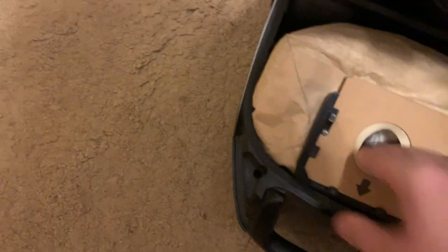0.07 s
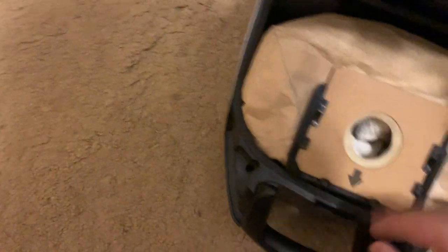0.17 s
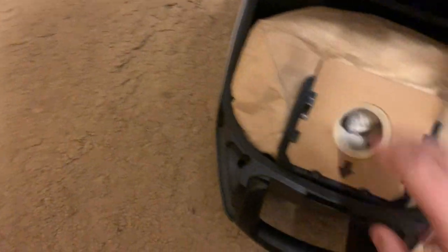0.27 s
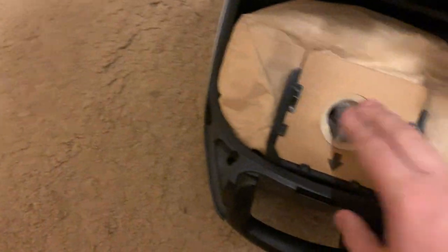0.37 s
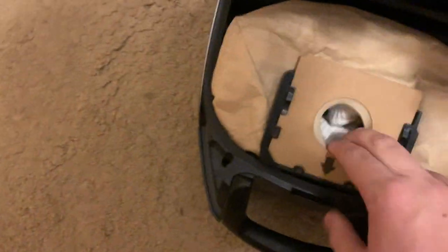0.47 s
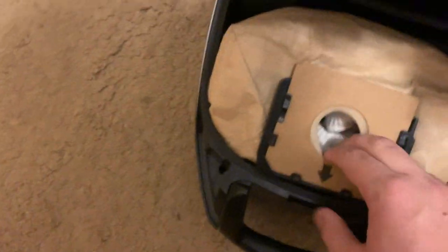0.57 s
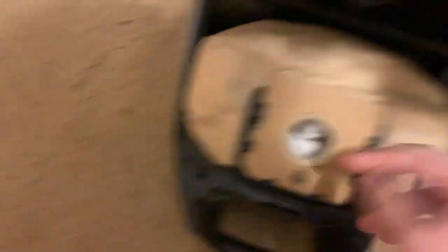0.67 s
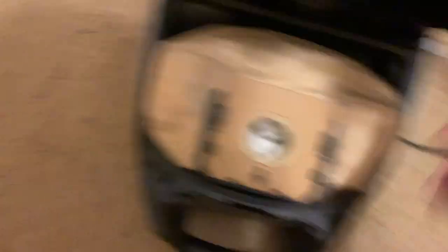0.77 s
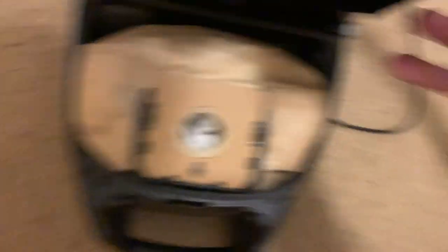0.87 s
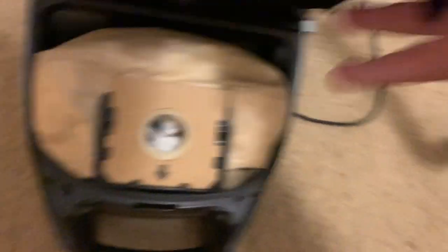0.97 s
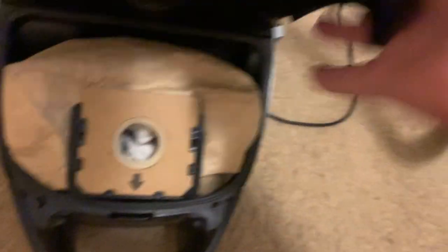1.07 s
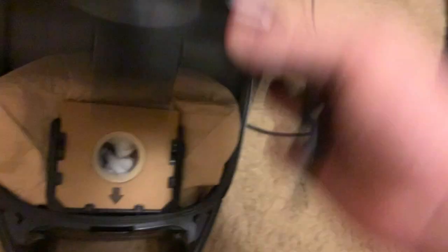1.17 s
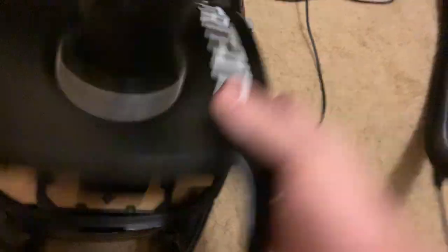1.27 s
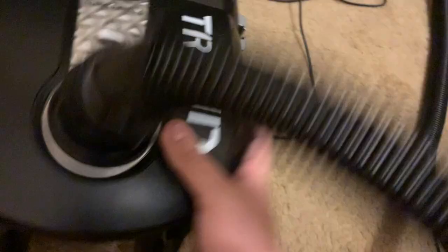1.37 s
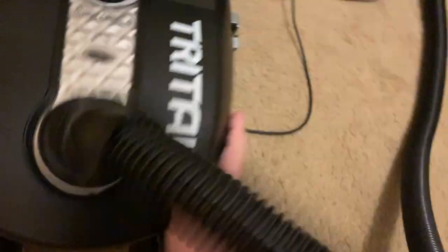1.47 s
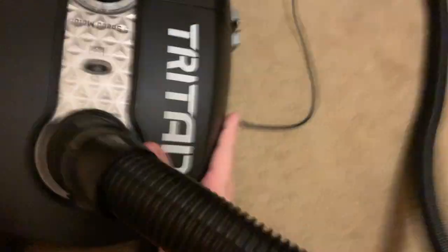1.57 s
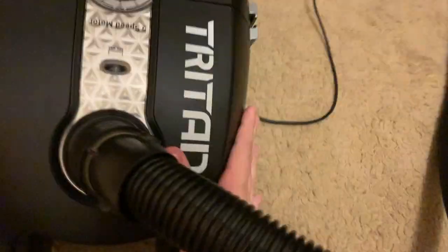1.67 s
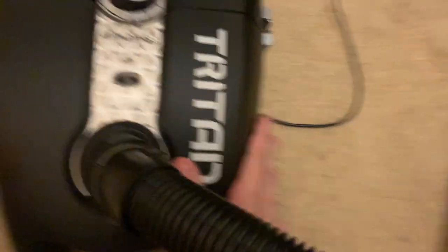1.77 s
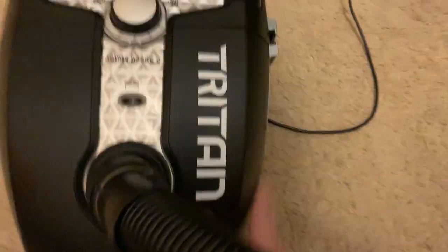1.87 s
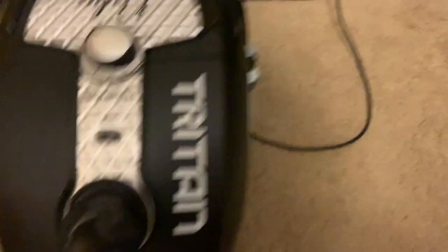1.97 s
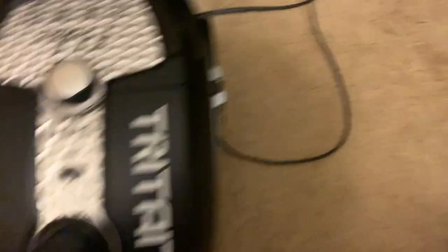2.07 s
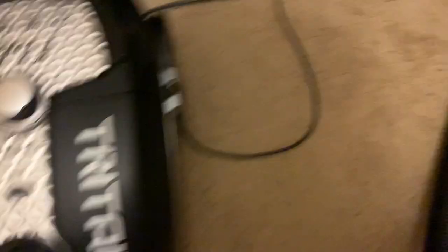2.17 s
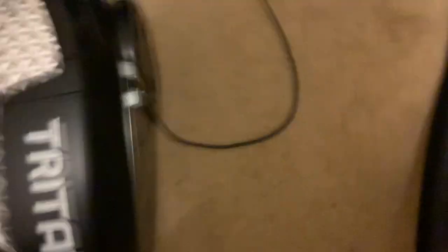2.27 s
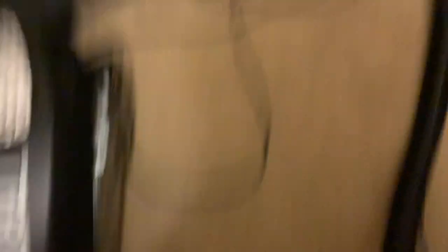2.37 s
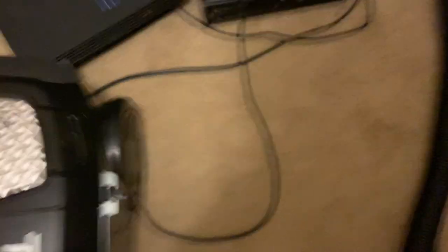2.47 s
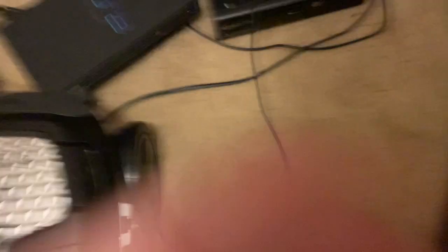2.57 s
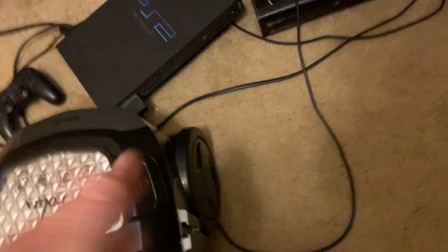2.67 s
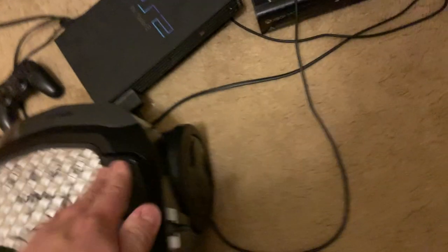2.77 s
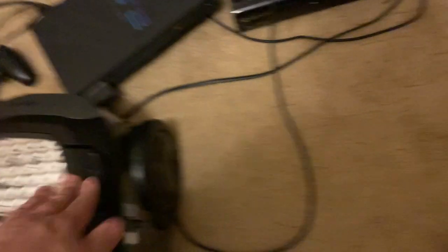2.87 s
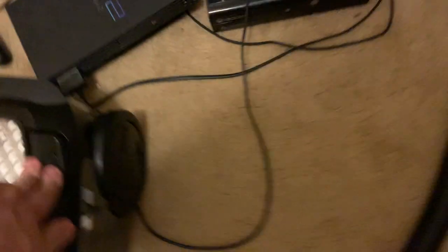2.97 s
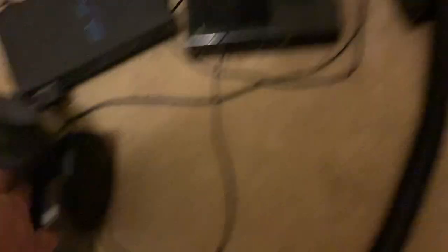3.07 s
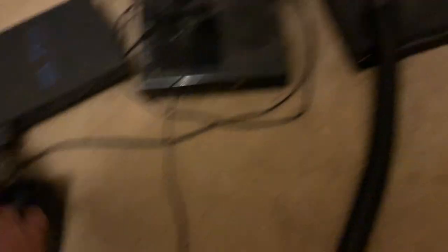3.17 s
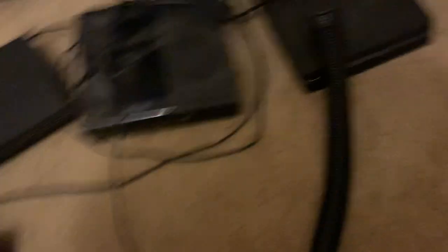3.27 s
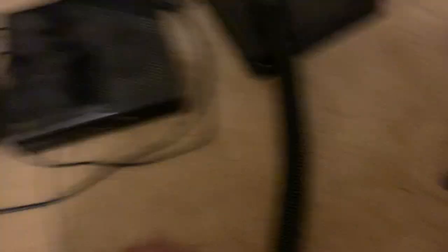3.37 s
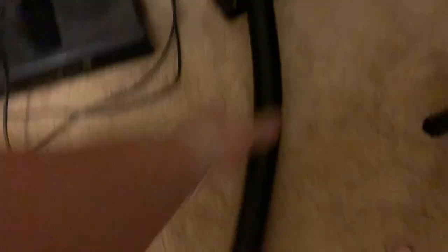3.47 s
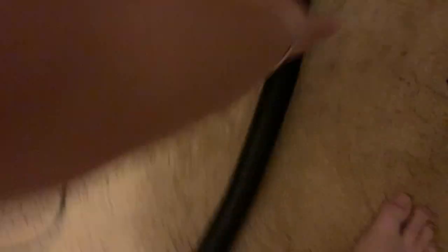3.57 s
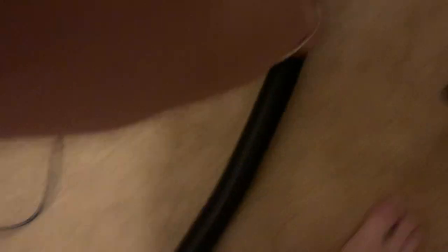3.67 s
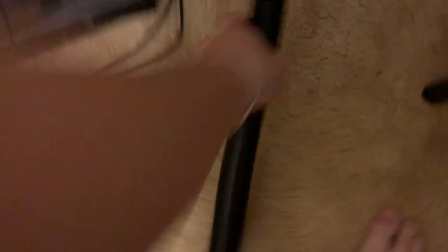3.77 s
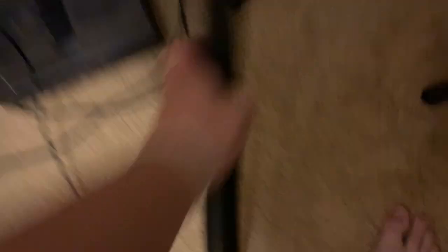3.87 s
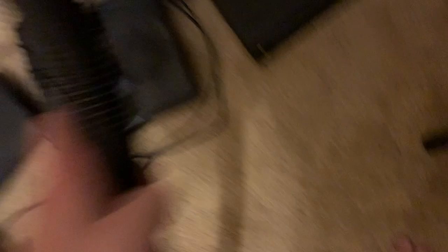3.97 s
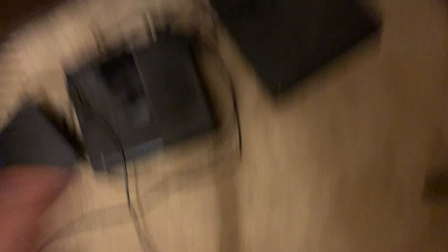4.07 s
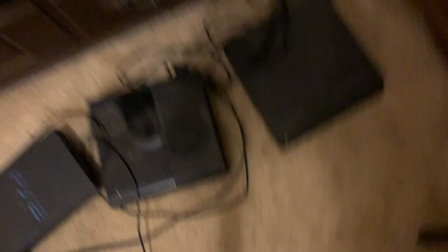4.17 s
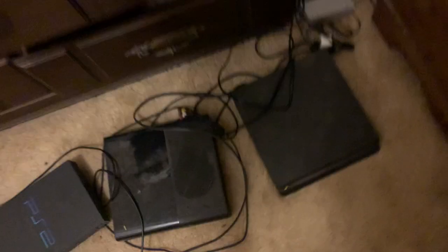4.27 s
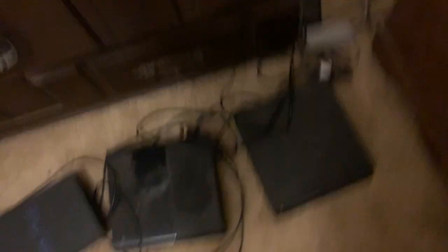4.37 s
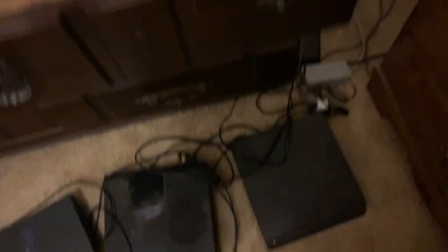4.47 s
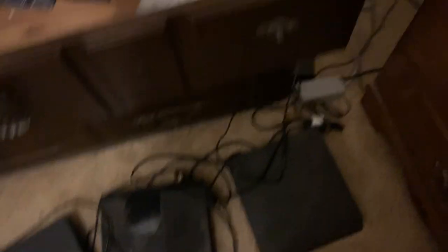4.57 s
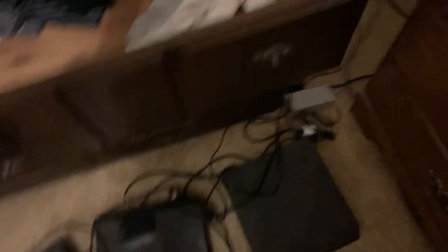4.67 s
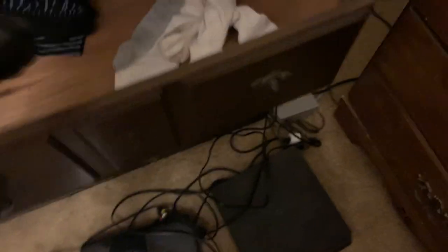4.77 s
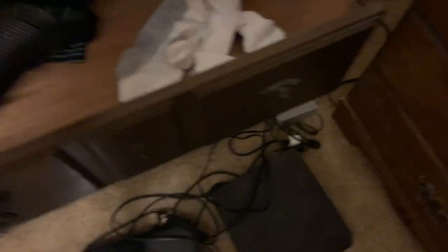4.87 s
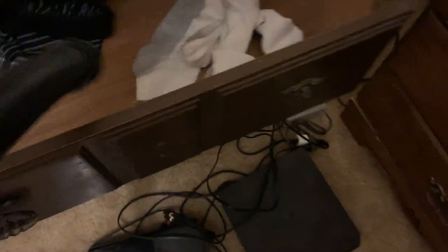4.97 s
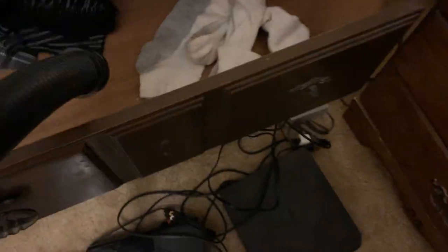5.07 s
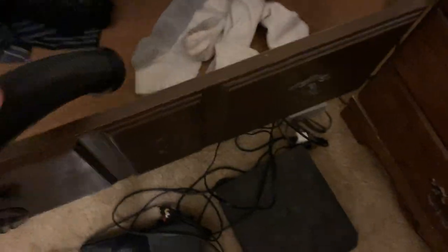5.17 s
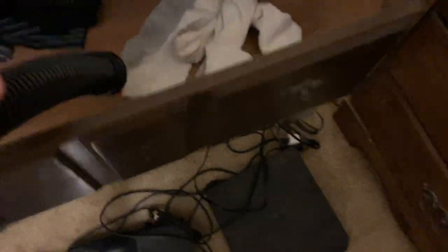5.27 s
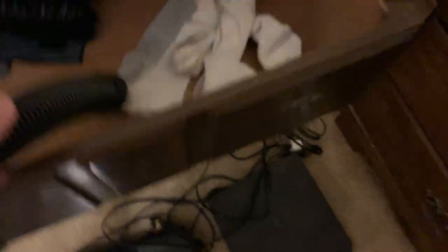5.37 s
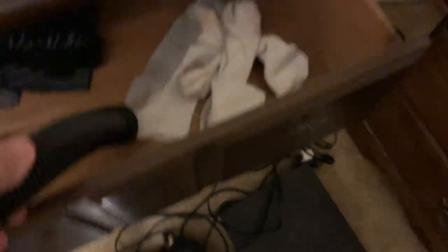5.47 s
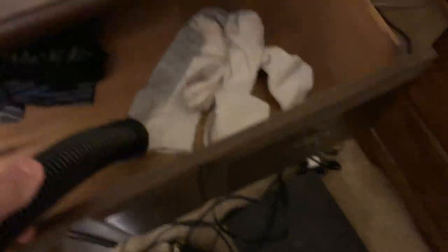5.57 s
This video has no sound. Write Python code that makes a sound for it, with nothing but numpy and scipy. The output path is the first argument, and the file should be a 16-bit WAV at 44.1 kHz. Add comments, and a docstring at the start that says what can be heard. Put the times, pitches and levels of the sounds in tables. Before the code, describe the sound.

A hand fiddles inside a canister vacuum, cracks its lid shut, presses the switch, and the motor spins up from mains hum into rushing air.

```python
"""Canister vacuum cleaner on a bedroom carpet: soft start with mains buzz, then rising whine and air rush.
Motor tones follow multiples of the shaft rate; air is filtered noise that grows with speed.
Before that a hand seats the bag holder, slams the plastic lid and presses the switch: noise bursts
and ringing modes. A hand-held camera with two microphone ports is close by; fingers shift on its body."""
import sys
import numpy as np
from scipy import signal
from scipy.fft import rfft, irfft, next_fast_len
from scipy.io import wavfile
from scipy.ndimage import uniform_filter1d, map_coordinates

SR = 44100
rng = np.random.default_rng(int(sys.argv[2]) if len(sys.argv) > 2 else 0)


def generate_wav(sig):
    """Save sig (samples, or channels by samples) to the path in sys.argv[1] as 16-bit PCM at SR."""
    pcm = np.round(np.clip(np.atleast_2d(sig).T, -1, 1) * 32767).astype(np.int16)
    wavfile.write(sys.argv[1], SR, pcm)


N = 248283

# motor shaft speed: time_s, rate_turns_per_s
SHAFT_SPEED = [(3.1, 2), (3.6, 38), (3.92, 96), (4.02, 121), (4.15, 172), (4.25, 205), (4.4, 256),
               (4.5, 285), (4.6, 306), (4.7, 328), (4.78, 340), (4.97, 372), (5.17, 411), (5.43, 456),
               (5.63, 484)]
# whine partials, each swelling at a casing resonance:
# multiple_of_shaft_rate, loudest_at_turns_per_s, half_width_turns_per_s, level_db
WHINE_PARTIALS = [(23.6, 104, 10, -57), (32, 178, 20, -67), (40, 190, 12, -68), (20, 300, 18, -57),
                  (18.5, 372, 20, -49), (24, 185, 9, -63), (16, 185, 10, -55), (16, 222, 22, -47),
                  (24, 226, 12, -56), (32, 240, 16, -57), (12, 272, 26, -48), (9, 255, 22, -52),
                  (14, 258, 16, -52), (10, 295, 30, -52), (16, 262, 16, -51), (12, 315, 18, -52),
                  (8, 356, 14, -49), (32, 335, 16, -55), (8, 290, 30, -52), (24, 278, 20, -46),
                  (24, 305, 9, -51), (24, 350, 12, -48), (16, 308, 11, -45), (16, 330, 11, -38),
                  (16, 383, 24, -45), (16, 412, 12, -46), (16, 445, 18, -42.5), (8, 468, 19, -41.5),
                  (24, 472, 20, -50)]
# breathy whistles of the air path:
# multiple_of_shaft_rate, loudest_at_turns_per_s, half_width_turns_per_s, level_db
AIR_WHISTLES = [(15, 195, 22, -57), (10.5, 200, 30, -58), (8, 255, 25, -50), (11.7, 285, 30, -48),
                (12.6, 325, 22, -46), (7.6, 325, 25, -50), (10, 352, 22, -47), (12.6, 378, 22, -45),
                (6.8, 378, 25, -47), (10.2, 412, 17, -41), (8.1, 415, 18, -47), (9, 440, 22, -41),
                (9.4, 474, 24, -37), (13.5, 470, 16, -43)]
# low air noise colour: freq_hz, density_db_per_hz
ROAR_COLOUR = [(40, -44), (90, 2), (150, 9), (210, 5), (350, -12), (520, 8.5), (750, 2.5), (1000, 2.5),
               (1500, -23.5), (3000, -37)]
# middle air noise colour: freq_hz, density_db_per_hz
RUSH_COLOUR = [(500, -6), (1200, -11), (1700, 2.5), (2400, 5), (3300, 3.5), (4100, 5), (4600, -2),
               (5200, -19), (6200, -14), (8000, -38.5)]
# high air and friction noise colour: freq_hz, density_db_per_hz
HISS_COLOUR = [(3000, -49.5), (4700, -7), (5300, 0), (6700, 5), (9000, 1), (10500, -1.5), (13000, -6.5),
               (16000, -16.5)]
# standing waves of hose and canister: freq_hz, width_hz, level_db
DUCT_MODES = [(219, 18.5, 8), (251, 15.7, 4), (311.2, 23, 2), (381.7, 24, 1.5), (445.3, 19, 3),
              (529, 24, -3), (576, 18, -4.5), (640, 21, -8.5), (725, 26, -8), (861, 37, -3.5),
              (928, 20, -3.5), (999, 12, -2), (1124, 30, -17), (1180, 37, -11.5), (1404, 56, -9)]
# roar and pipe growth with speed: full_speed_db, loss_db_per_octave, loss_db_per_octave_squared
ROAR_GROWTH = (-30.5, 11.94, 0.18)
# rush growth with speed: full_speed_db, loss_db_per_octave, loss_db_per_octave_squared
RUSH_GROWTH = (-36.5, 2.1, 6.5)
# hiss growth with speed: full_speed_db, loss_db_per_octave, loss_db_per_octave_squared
HISS_GROWTH = (-32.5, 12.9, 6.8)
# top hiss growth with speed: full_speed_db, loss_db_per_octave, loss_db_per_octave_squared
FIZZ_GROWTH = (-27.5, 17.4, 11)
# mains hum harmonics: freq_hz, level_db
MAINS_HARMONICS = [(120, 0), (240, -9.5), (360, -13), (600, -21)]
# mains noise during the soft start: time_s, hum_db, buzz_db
MAINS_LEVELS = [(2.9, -76, -100), (3.3, -67, -64.5), (3.6, -53.5, -67.5), (3.68, -48.5, -54),
                (4.2, -46, -49.5), (4.6, -47, -64), (5.63, -43, -66)]

# lid drops, rattles in its seat, catches and latches:
# start_s, strength_db, knock_over_clack_db, click_over_clack_db, panel_hz
LID_HITS = [(1.499, -48, -4, -4, 1490), (1.514, -28, -12, -5, 1495), (1.554, -19, -5.5, -10, 3360),
            (1.559, -26, -5, -13, 1080), (1.567, -22, -7.5, -8.5, 1250), (1.572, -16.5, -4, -13, 1246),
            (1.579, -24, 5.5, -11, 783), (1.59, -31.5, 6.5, -13, 690), (1.646, -28.5, -4.5, -5.5, 1289),
            (1.651, -11.5, -5.5, -1.5, 1328), (1.658, -21, 3.5, -9, 641), (1.668, -28.5, 1, -5, 1384),
            (1.678, -31, 1, -8, 1184)]
# lid ringing: freq_hz, level_db, t60_s
LID_MODES = [(610, -3, 0.084), (957, -14.5, 0.2), (1230, -25.5, 0.69), (1280, -13, 0.22),
             (1470, -13.5, 0.2), (1620, -10.5, 0.15), (2120, -22, 0.24), (3370, -23, 0.25),
             (3540, -26.5, 0.53), (3720, -22, 0.72), (4000, -32, 0.7), (5416, -34, 0.2), (6390, -31, 0.55),
             (6700, -28.5, 0.17)]
# lid knock colour: freq_hz, density_db_per_hz
LID_KNOCK_COLOUR = [(60, -16), (170, 1.5), (300, 2.5), (520, -5.5), (750, -6.5), (1400, -21), (4000, -73)]
# lid clack colour: freq_hz, density_db_per_hz
LID_CLACK_COLOUR = [(250, -30.5), (620, -5), (900, -9.5), (1200, 5.5), (1430, 4), (1900, -6.5), (3000, -7),
                    (3900, -1.5), (5500, -14.5), (12000, -48)]
# canister air excited by the lid: freq_hz, level_db
LID_AIR_MODES = [(190, -6), (265, -6.5), (335, -5), (385, -6.5), (465, -13.5), (600, -7.5), (680, -4)]
# power button goes down and springs back:
# start_s, strength_db, knock_over_clack_db, click_over_clack_db, panel_hz
SWITCH_HITS = [(2.888, -32.5, 1.7, -23.5, 943), (2.921, -36.5, 6, 7, 1016), (2.932, -41.5, 12.3, -9.5, 800),
               (3.068, -41, 4, 5, 910), (3.096, -25.5, 2, -8.5, 1735)]
# button ringing: freq_hz, level_db, t60_s
BUTTON_MODES = [(693, -2, 0.095), (874, -10, 0.34), (1230, -14, 0.05), (1780, -14, 0.27), (1970, -19, 0.2),
                (2320, -30, 0.2), (2550, -12, 0.11), (2680, -4.5, 0.043), (2850, -20, 0.16)]
# button clack colour: freq_hz, density_db_per_hz
BUTTON_CLACK_COLOUR = [(250, -22), (650, 1.5), (920, 5), (1300, -0.5), (1750, -2), (2600, -10.5),
                       (3800, -12), (5500, -17), (12000, -41.5)]
# canister air excited by the button: freq_hz, level_db
BUTTON_AIR_MODES = [(310, -5.5), (510, -5), (640, -17)]
# light plastic contacts of bag holder, canister and hose:
# start_s, strength_db, knock_over_clack_db, click_over_clack_db, panel_hz
LIGHT_HITS = [(0.389, -52.5, 10.5, -7, 1840), (0.418, -47.5, 8.5, -1.5, 1130), (0.432, -35, 9, -12.5, 500),
              (0.446, -46.5, 8.5, -16, 477), (0.437, -39.5, -15, -2.5, 1110),
              (0.615, -47.5, 11, -1.5, 1000), (0.624, -40.5, -8, -10, 675), (0.827, -44, 0, 3, 1150),
              (0.834, -32, -0.5, -2.5, 1473), (0.86, -33.5, -1.5, 0, 1370), (0.964, -47.5, -2, -1, 1830),
              (0.987, -46, -1.5, 10.5, 3060), (1.016, -40.5, -14, -0.5, 3350), (1.202, -46.5, -3, -6, 1170),
              (1.246, -48, 0.5, -11.5, 680), (1.783, -46, -1, -15, 880), (1.803, -48.5, 2, -16, 720),
              (1.931, -47, 1, -18.5, 763), (1.938, -53.5, 9.5, 2.5, 1043), (1.949, -52.5, -3.5, -17, 800),
              (1.988, -50, -2, -14.5, 1090), (1.997, -49.5, -8.5, -17.5, 963), (2.066, -59, 9.5, -21, 1100),
              (2.082, -53.5, -3, -8.5, 1014), (2.269, -51.5, 2, 9, 1068), (2.279, -56, 6, 9, 1446),
              (2.408, -57.5, -22, -12, 830), (2.421, -59.5, -30, -11, 1157), (2.474, -56, -18.5, 5.5, 2364),
              (2.551, -71, -11.5, 15, 2543), (3.417, -54.5, 9, -12, 1320), (3.662, -60.5, 13, 7, 1124),
              (3.732, -48, 7.5, -28, 1134), (3.903, -50.5, 3.5, -25.5, 1346), (4.062, -53, -4, -11, 3420),
              (4.09, -50, 5.5, -20, 915)]
# plastic canister ringing: freq_hz, level_db, t60_s
SHELL_MODES = [(780, -2.5, 0.13), (1100, -6, 0.26), (1260, -17.5, 0.35), (1360, -13, 0.2),
               (1255, -20, 0.073), (1556, -26, 0.16), (2020, -22, 0.24), (3130, -38, 0.25),
               (3420, -35, 0.43), (3970, -37, 0.35), (4170, -23, 0.3), (5450, -33, 0.12),
               (6180, -46.5, 0.47), (6380, -29.5, 0.41), (6799, -29, 0.22), (8050, -18.5, 0.12)]
# canister knock colour: freq_hz, density_db_per_hz
KNOCK_COLOUR = [(60, -25), (170, -6), (300, 7), (500, -2.5), (750, -6), (1400, -19), (4000, -75)]
# canister clack colour: freq_hz, density_db_per_hz
CLACK_COLOUR = [(250, -40.5), (700, -8.5), (950, 0.5), (1350, -1), (2000, -3), (3000, -6), (3900, -6),
                (5500, -15.5), (12000, -66)]
# canister air excited by the bag holder: freq_hz, level_db
HOLDER_AIR_MODES = [(185, -3.5), (325, -7), (410, -9), (490, -6.5), (690, -14)]
# edge click colour: freq_hz, density_db_per_hz
CLICK_COLOUR = [(1200, -32), (3300, -8.5), (5000, -5), (6500, -4.5), (8500, -11), (11000, -14.5),
                (16000, -33.5)]
# high edge tick colour: freq_hz, density_db_per_hz
TICK_COLOUR = [(5000, -32), (9000, -1), (10500, -4.5), (13000, -7), (16000, -15.5)]
# dull bumps of canister, hose and hand: start_s, relative_level_db, pitch_hz
DULL_BUMPS = [(0.436, -23.5, 152), (1.331, -34.5, 86), (1.353, -28.5, 150), (1.368, -23.5, 61.4),
              (1.398, -29, 62), (1.441, -24, 117.5), (1.459, -25.5, 62), (1.579, -22, 214),
              (1.597, -18.5, 81.3), (1.611, -17, 125), (1.628, -15, 92), (1.66, -16.5, 158.8),
              (1.682, -17.5, 59.7), (1.694, -23, 146), (1.716, -29, 165), (1.762, -40, 75),
              (2.011, -35, 89.4), (2.282, -20.5, 64), (2.417, -53, 61.3), (2.556, -36, 84.8),
              (3.155, -23.5, 73.4), (3.184, -24.5, 55.5), (3.24, -29, 60.7), (3.333, -32.5, 56.3),
              (3.49, -36.5, 54.4), (3.673, -32, 161), (3.984, -27, 72), (4.042, -32.5, 48.9)]
# bump shudder colour: freq_hz, density_db_per_hz
THUD_COLOUR = [(25, -20.5), (55, 1), (160, -1.5), (260, -11), (450, -28), (1000, -60.5)]
# strokes of hand, paper bag and hose: start_s, length_s, scuff_db, hiss_db
RUB_STROKES = [(0, 0.13, -46.5, -52), (0.95, 0.83, -51.5, -59), (1.172, 0.18, -46.5, -52),
               (1.296, 0.55, -59, -83), (1.437, 0.45, -42.5, -42), (1.769, 0.12, -61, -61),
               (1.819, 0.26, -59.5, -43.5), (2.037, 0.24, -60.5, -65), (2.342, 0.069, -68.5, -51),
               (2.393, 0.037, -56, -77), (2.652, 0.084, -52, -74.5), (3.157, 0.5, -57.5, -76.5),
               (3.497, 0.41, -52.5, -60.5), (3.728, 1, -56, -68)]
# scuffing colour: freq_hz, density_db_per_hz
PAPER_COLOUR = [(150, -2.5), (500, -0.5), (1200, -2), (2000, -5), (3800, -9), (6000, -15.5), (16000, -53.5)]

# fingers shifting on the camera body: start_s, relative_thud_db, pitch_hz, tap_db
GRIP_SHIFTS = [(2.272, -21, 72.6, -26), (2.338, -40, 95.7, -52.5), (2.386, -44, 149, -46),
               (2.477, -18.5, 62, -33.5), (2.508, -37.5, 94.5, -36.5), (2.553, -43, 159.4, -40)]
# skin on the camera body, colour: freq_hz, density_db_per_hz
SKIN_COLOUR = [(60, -9), (200, 6), (600, -3), (1100, -7.5), (2000, -13), (5000, -25), (14000, -38.5)]
# camera rumble colour: freq_hz, density_db_per_hz
RUMBLE_COLOUR = [(15, -51), (27, -26), (38, -9.5), (55, 7.5), (90, -10), (200, -22), (500, -55.5)]
# room noise colour: freq_hz, density_db_per_hz
FLOOR_COLOUR = [(15, -57.5), (25, -18), (70, -2.5), (102, -5.5), (145, -6.5), (180, -15), (242, -7),
                (309, -4.5), (344, -7.5), (695, -30), (4370, -49.5), (11000, -45.5), (16000, -45.5)]
# room noise phase swing between the ports, fingers on a port: time_s, half_turns
PHASE_SWING = [(2.26, 0), (2.34, .6), (2.42, .93), (2.54, .93), (2.6, .3), (2.66, 0)]
# bedroom decay: freq_hz, t60_s
ROOM_DECAY = [(80, 0.93), (300, 0.37), (1200, 0.33), (4000, 0.34), (8000, 0.21), (15000, 0.11)]
# port phase difference: freq_hz, left_lead_rad
PORT_LEAD = [(20, 0), (700, 0), (1150, -1.1), (1900, -.4), (2500, 2), (3400, 1.6), (4100, 2.3), (4700, 3.1),
             (5300, 4.1), (6400, 6.1), (7100, 6.6), (9000, 9.4), (10700, 12.3), (11500, 12.7),
             (12800, 15.4), (13600, 15.9), (14700, 18.8)]
# port similarity: freq_hz, likeness_0_to_1
PORT_LIKENESS = [(50, 1), (350, 1), (700, 0.89), (1300, 0.072), (2300, 0.29), (4000, 0.97), (12000, 1)]
# early wide bass: freq_hz, left_lead_rad, left_over_right_db
EARLY_WIDE_BASS = [(30, -.3, .5), (130, -.5, 2), (260, -.8, 2), (440, -.4, 2.5), (580, -.6, 5),
                   (720, .1, 3), (1000, -.6, -1), (1350, -.5, -3), (2100, 0, 0)]

POWER_ON_S, SOFT_START_S = 2.9, 0.58  # switch closes; voltage ramp length
FULL_SPEED_HZ, FIZZ_HZ = 484, 9000
MOUNT_HZ, MOUNT_WIDTH_HZ = 255, 66  # motor rocks on its mounts as the shaft passes this rate
MOTOR_DIRECT_DB, MOTOR_ROOM_DB = -2, -6.5
STROKE_ATTACK, STROKE_RELEASE, STROKE_SAG_DB = 0.25, 0.55, 14  # shares of stroke length; loss along it
GRIP_DRAG_DB, QUIET_DB = -63, -57.5
NARROW_S, NARROW_HZ = 2.58, 560  # bass narrows: when, below what
LOW_CUT_HZ, TOP_HZ = 24, 16000

SHARED_ONLY = np.array([[1], [0]])  # pair = (shared, unshared) until ports()
OPPOSED = np.array([[1], [-1]])
QUARTER_TURN = np.array([[0], [np.pi / 2]])


def motor(unbalance_db=-36):
    """Rotor unbalance, blades and commutator sound at multiples of the shaft rate."""
    rate = curves(SHAFT_SPEED)[0]
    turn = phase(rate * (1 + .003 * wobble(60)))
    whine = 0
    for multiple, centre, width, db in WHINE_PARTIALS:
        level = amp(db + 2.6 * wobble(25) + 2.5 * wobble(90)) * swell(rate, centre, width)
        whine = whine + level * np.sin(multiple * turn)
    shake = amp(unbalance_db) * abs(resonance(rate, MOUNT_HZ, MOUNT_WIDTH_HZ)) * np.sin(turn)
    tones = np.sqrt(2) * whine * drive()
    direct = tones + np.sqrt(2) * shake * drive()
    return amp(MOTOR_DIRECT_DB) * direct * SHARED_ONLY + amp(MOTOR_ROOM_DB) * room(tones)


def whistles(gain_db=3.5, width_hz=170):
    """Narrow bands of turbulence climb with the fan and fade in turn."""
    rate = curves(SHAFT_SPEED)[0]
    turn = phase(rate)
    tones = 0
    for multiple, centre, width, db in AIR_WHISTLES:
        breathy = wobble(width_hz) * np.sin(multiple * turn) + wobble(width_hz) * np.cos(multiple * turn)
        tones = tones + amp(db + gain_db) * swell(rate, centre, width) * breathy
    return amp(MOTOR_DIRECT_DB) * tones * SHARED_ONLY + amp(MOTOR_ROOM_DB) * room(tones)


def airflow(roar_db=-8, duct_db=-0.5, ripple_db=2.0, flicker_db=2.9):
    """The fan drives air through bag, hose and exhaust and their standing waves; faster is louder, brighter."""
    def duct(hz):
        modes = sum(amp(db) * resonance(hz, centre, width) for centre, width, db in DUCT_MODES)
        return modes * hz ** 4 / (hz ** 4 + 150 ** 4) / (1 + (hz / 1700) ** 4)

    pipes = unit(filtered(rng.standard_normal((2, N)), duct))
    dense = np.column_stack([np.geomspace(600, 16000, num=260), rng.standard_normal(260)])

    def rippled(x):
        """Crowded higher modes."""
        return unit(filtered(x, lambda hz: amp(ripple_db * along(dense, hz))))

    low = amp(roar_db) * patchy(noise(ROAR_COLOUR), flicker_db / 2)
    low += amp(duct_db) * patchy(pipes, flicker_db / 2)
    air = amp(speed_db(ROAR_GROWTH) + 0.9 * wobble(14)) * low
    rush = patchy(rippled(noise(RUSH_COLOUR)), flicker_db)
    air += amp(speed_db(RUSH_GROWTH) + 0.1 * wobble(28)) * rush
    hiss = patchy(rippled(noise(HISS_COLOUR)), flicker_db / 2)
    fizz = filtered(hiss, lambda hz: hz > FIZZ_HZ)  # the very top needs the fastest air
    air += amp(speed_db(HISS_GROWTH)) * (hiss - fizz) + amp(speed_db(FIZZ_GROWTH)) * fizz
    return drive() * air


def mains(waver_db=2.5, iron_hz=1215, iron_width_hz=170, rasp=0.093):
    """Speed control chops the mains: wavering hum, and a rasping kick to the motor iron each half cycle."""
    t = np.arange(N) / SR
    hum_db, buzz_db = curves(MAINS_LEVELS)
    hum = 0
    for hz, db in MAINS_HARMONICS:
        tone = np.sin(2 * np.pi * hz * t + rng.uniform(0, 2 * np.pi))
        hum = hum + amp(db + waver_db * wobble(9.8)) * np.sqrt(2) * tone
    half_cycles = t * MAINS_HARMONICS[0][0]
    kicks = np.diff(np.floor(half_cycles), prepend=0)
    kicks = kicks + rasp * (1 - half_cycles % 1) * rng.standard_normal(N)
    iron = unit(filtered(kicks, lambda hz: resonance(hz, iron_hz, iron_width_hz) ** 2))
    return (amp(hum_db) * hum + amp(buzz_db + waver_db * wobble(8.6)) * iron) * (t > POWER_ON_S)


def drive():
    """Soft-start voltage: 0 before the switch, 1 when fully on."""
    return np.clip((np.arange(N) / SR - POWER_ON_S) / SOFT_START_S, 0, 1)


def speed_db(law):
    """Level set by the present shaft speed."""
    full_db, slope_db, droop_db = law
    octaves = np.log2(FULL_SPEED_HZ / np.maximum(curves(SHAFT_SPEED)[0], 1))
    return full_db - slope_db * octaves - abs(droop_db) * octaves ** 2


def swell(rate, centre, width):
    """Gain of a partial as the shaft passes the rate that favours it."""
    return np.exp(-((rate - centre) / width) ** 2)


def patchy(x, depth_db):
    """Turbulence: narrow bands of x flicker, each on its own."""
    z = signal.stft(x, nperseg=1024)[2]
    field = uniform_filter1d(rng.standard_normal(z.shape[1:]), size=3, axis=0)
    field = uniform_filter1d(field, size=4, axis=1)
    return unit(signal.istft(z * amp(depth_db * unit(field)), nperseg=1024)[1][:, :N])


def lid():
    """Heavy blows: a hard crack, and the whole lid rings."""
    return contacts(LID_HITS, LID_KNOCK_COLOUR, LID_CLACK_COLOUR, LID_AIR_MODES, LID_MODES,
                    knock_db=-1.5, clack_db=2.5, click_db=8, tick_db=-6.5, ring_db=-17.5, cavity_db=0.0,
                    panel_db=6.0, sweep=.2, knock_t60_s=0.081, clack_t60_s=0.042, click_t60_s=.015,
                    rise_s=0.0012, chatter_db=1.5, room_db=-11.0)


def switch():
    """Big button: a sharp spring click and a thick, well damped clunk."""
    return contacts(SWITCH_HITS, KNOCK_COLOUR, BUTTON_CLACK_COLOUR, BUTTON_AIR_MODES, BUTTON_MODES,
                    knock_db=-2.0, clack_db=2.0, click_db=4.5, tick_db=8.0, ring_db=-6.5, cavity_db=4.0,
                    panel_db=6, sweep=0.61, knock_t60_s=0.163, clack_t60_s=0.091, click_t60_s=0.018,
                    rise_s=0.0022, chatter_db=1.5, room_db=-7.5)


def handling():
    """Light taps on the bag holder, canister and hose."""
    return contacts(LIGHT_HITS, KNOCK_COLOUR, CLACK_COLOUR, HOLDER_AIR_MODES, SHELL_MODES,
                    knock_db=1, clack_db=0.0, click_db=6.5, tick_db=3, ring_db=-16.5, cavity_db=-1.0,
                    panel_db=6.0, sweep=0.27, knock_t60_s=.12, clack_t60_s=0.081, click_t60_s=.025,
                    rise_s=0.0007, chatter_db=2.5, room_db=-11.5)


def contacts(rows, knock_colour, clack_colour, air_modes, shell_modes, knock_db, clack_db, click_db, tick_db,
             ring_db, cavity_db, panel_db, sweep, knock_t60_s, clack_t60_s, click_t60_s, rise_s, chatter_db,
             room_db, sweep_s=0.005, cavity_t60_s=0.076, panel_t60_s=0.037, swell_s=0.0038):
    """Each contact clicks and chatters, clacks in its panel, knocks in the hollow canister; modes ring on."""
    out, t = np.zeros((2, N)), np.arange(SR // 3) / SR
    colours = [noise(spectrum) for spectrum in (knock_colour, clack_colour, CLICK_COLOUR, TICK_COLOUR)]
    chatter = amp(chatter_db * wobble(450))

    def fade(t60_s):
        return amp(-60 * t / t60_s)

    def mode(hz, t60_s):
        return fade(t60_s) * np.sin(2 * np.pi * hz * t + rng.uniform(0, 2 * np.pi) + QUARTER_TURN)

    def burst(grain, shape):
        """Shaped noise with the energy of its envelope."""
        shaped = grain * shape
        return shaped * np.linalg.norm(shape) / np.linalg.norm(shaped, axis=1, keepdims=True)

    for s, db, weight_db, hard_db, panel_hz in rows:
        start = rng.integers(N - len(t))
        knock, clack, click, tick = [c[:, start:start + len(t)] for c in colours]
        rough = chatter[start:start + len(t)]
        cavity = sum(amp(cavity_db + level_db) * mode(hz, cavity_t60_s) for hz, level_db in air_modes)
        hollow = amp(knock_db) * burst(knock, fade(knock_t60_s)) + cavity
        # high bending waves arrive first
        bending_hz = panel_hz * (1 + sweep * (np.exp(-t / sweep_s) - .5))
        flex = fade(panel_t60_s) * np.sin(phase(bending_hz) + QUARTER_TURN)
        panel = amp(clack_db) * burst(clack * rough, fade(clack_t60_s)) + amp(panel_db) * flex
        for hz, level_db, t60_s in shell_modes:
            panel += amp(ring_db + level_db + rng.normal(0, 2.6)) * mode(hz, t60_s)
        # the air inside takes a moment to answer
        hit = amp(db + weight_db) * hollow * (1 - np.exp(-t / swell_s))
        hit += amp(db) * panel * (1 - np.exp(-t / rise_s))
        # edges meet over a few milliseconds
        bite = fade(click_t60_s) * (1 - np.exp(-t / .0011))
        edges = amp(click_db) * burst(click * rough, bite) + amp(tick_db) * burst(tick * rough, bite)
        hit += amp(db + hard_db) * edges
        add(out, s, hit)
        add(out, s, amp(room_db) * room(hit[0]))
    return out


def lead_ins(gain_db=-14, grain_db=4, lead_s=0.0066):
    """Faint grainy noise swells for a few milliseconds before each contact."""
    level, t = np.zeros(N), np.arange(-SR // 20, 0) / SR
    for s, db, weight_db, *_ in [*LIGHT_HITS, *LID_HITS, *SWITCH_HITS]:
        add(level, s + t[0], amp(min(db + weight_db, -34) + gain_db) * np.exp(t / lead_s))
    hissing = noise(PAPER_COLOUR) + amp(-6.5) * noise(CLICK_COLOUR)
    return level * unit(amp(grain_db * wobble(300))) * hissing


def bumps(rows, t60_s=.11, rise_s=0.0072, bend=0.33, settle_s=0.026, gain_db=4, rough=0.16, shudder_db=-11):
    """Soft blows: uneven low cycles that sink in pitch as the push relaxes, and a toneless shudder."""
    out, t = np.zeros(N), np.arange(SR // 3) / SR
    shudder = noise(THUD_COLOUR)[0]
    for s, db, hz in rows:
        uneven = np.exp(rough * wobble(120)[:len(t)])
        swing = np.sin(phase(hz * uneven * (1 + bend * np.exp(-t / settle_s))))
        swing = swing + amp(shudder_db) * shudder[round(s * SR):][:len(t)]
        add(out, s, amp(db + gain_db - 60 * t / t60_s) * (1 - np.exp(-t / rise_s)) * swing)
    return out


def rubbing(hiss_db=-7.5, catches_per_s=40, catch_db=5, catch_s=0.0036):
    """Skin, paper and plastic slide over each other in strokes, with small random catches."""
    scuff, hiss = np.zeros((2, N))
    for s, length, low_db, high_db in RUB_STROKES:
        u = np.clip((np.arange(N) / SR - s) / length, 0, 1)
        ramps = np.minimum(u / STROKE_ATTACK, (1 - u) / STROKE_RELEASE)
        press = np.clip(ramps, 0, 1) * amp(-STROKE_SAG_DB * u)
        scuff, hiss = scuff + amp(low_db) * press, hiss + amp(high_db) * press
    snags = (rng.random(N) < catches_per_s / SR) * rng.random(N)
    catches = signal.lfilter([1], [1, -np.exp(-1 / (catch_s * SR))], snags)
    slide = scuff * noise(PAPER_COLOUR) + amp(hiss_db) * hiss * noise(HISS_COLOUR)
    return unit(1 + amp(catch_db) * catches) * slide


def fingers(tap_t60_s=0.036, tap_rise_s=0.00049, drag_grain_db=3.0):
    """Fingers tap and drag on the camera body, which pushes its two ports in opposite senses."""
    t = np.arange(N) / SR
    held = 1. * (t > GRIP_SHIFTS[0][0]) * (t < GRIP_SHIFTS[-1][0])  # first touch to last
    touch = amp(GRIP_DRAG_DB + drag_grain_db * wobble(60)) * uniform_filter1d(held, size=800)
    for s, _, _, tap_db in GRIP_SHIFTS:
        age = np.maximum(t - s, 0)
        touch = touch + amp(tap_db - 60 * age / tap_t60_s) * (1 - np.exp(-age / tap_rise_s))
    thuds = bumps([row[:3] for row in GRIP_SHIFTS], t60_s=0.088, bend=1.8, settle_s=0.01, gain_db=-4,
                  rough=0.18)
    return (thuds + touch * noise(SKIN_COLOUR)[0]) * OPPOSED


def rumble(shake_db=-17, rise_s=0.031, settle_s=0.066, carry_db=-65, sway_db=3):
    """The carried camera rumbles faintly, more around each bump, most for strong deep ones."""
    t = np.arange(N) / SR
    deepest_hz = min(hz for _, _, hz in DULL_BUMPS)
    power = 0
    for s, db, hz in DULL_BUMPS:
        around = np.exp(-2 * np.maximum((s - t) / rise_s, (t - s) / settle_s))
        power = power + (amp(db + shake_db) * deepest_hz / hz) ** 2 * around
    return np.sqrt(2 * power + amp(carry_db + sway_db * wobble(14)) ** 2) * noise(RUMBLE_COLOUR)


def quiet():
    """Almost steady room noise; its phase between the ports swings under the fingers."""
    pair = ports(noise(FLOOR_COLOUR) * [[1], [.5]])
    pair = signal.hilbert(pair, next_fast_len(N))[:, :N]
    swung = np.real(pair * np.exp(1j * np.pi * curves(PHASE_SWING)[0] * [[0], [1]]))
    return amp(QUIET_DB + 0.26 * wobble(0.58)) * swung


def room(x):
    """Bedroom reverberation: noise tail in which each frequency dies at its own speed."""
    hz, t, z = signal.stft(rng.standard_normal((2, SR // 2)), SR, nperseg=256)
    tail = signal.istft(z * amp(-60 * t / along(ROOM_DECAY, hz)[:, None]), SR, nperseg=256)[1]
    tail = np.pad(tail / np.linalg.norm(tail[0]), ((0, 0), (SR // 200, 0)))
    return signal.fftconvolve(np.atleast_2d(x), tail, axes=1)[:, :N]


def ports(pair):
    """A shared and an unshared sound become left and right, with a phase lead between the ports."""
    def mix(hz):
        angle = np.arccos(np.clip(along(PORT_LIKENESS, hz), 0, 1)) / 2
        return np.array([np.cos(angle), np.sin(angle)])

    def lead(hz):
        return np.exp(.5j * np.interp(hz, *np.transpose(PORT_LEAD)) * OPPOSED)

    shared, apart = filtered(pair, mix)
    return filtered(np.array([shared + apart, shared - apart]), lead)


def bass_image(x):
    """Bass is spread between the ears at first, then narrows to the centre."""
    def spread(hz):
        lead, tilt_db = (along(np.array(EARLY_WIDE_BASS)[:, [0, k]], hz) for k in range(1, 3))
        return np.exp(.5j * lead * OPPOSED) * amp(.5 * tilt_db * OPPOSED)

    side = filtered((x[0] - x[1]) / 2, lambda hz: hz ** 6 / (hz ** 6 + NARROW_HZ ** 6))
    narrow = np.clip((np.arange(N) / SR - NARROW_S) / .03, 0, 1)
    return (1 - narrow) * filtered(x, spread) + narrow * (x.mean(axis=0) + side * OPPOSED)


def resonance(hz, centre, width):
    """Complex response of one resonance, 1 at its centre."""
    return 1j * hz * width / (centre ** 2 - hz * hz + 1j * hz * width)


def noise(spectrum):
    """Two unrelated coloured noises, together of rms 1."""
    return unit(filtered(rng.standard_normal((2, N)), lambda hz: amp(along(spectrum, hz))))


def filtered(x, response):
    """x times a complex response of frequency."""
    m = next_fast_len(N + SR // 2)
    return irfft(rfft(x, m) * response(np.fft.rfftfreq(m, 1 / SR)), m)[..., :N]


def wobble(rate):
    """Smooth random curve, rate knots a second."""
    return map_coordinates(rng.standard_normal(int(N * rate / SR) + 4), [np.arange(N) * rate / SR])


def phase(hz):
    """Running phase in radians of a changing frequency."""
    return 2 * np.pi * np.cumsum(hz) / SR


def curves(rows):
    """One value per sample for each column after the time."""
    s, *cols = np.transpose(rows)
    return [np.interp(np.arange(N) / SR, s, c) for c in cols]


def along(points, hz):
    """(freq_hz, value) points read on a log axis."""
    f, v = np.transpose(points)
    return np.interp(np.log(hz + 1), np.log(f + 1), v)


def amp(db):
    """Decibels to gain."""
    return 10 ** (np.asarray(db) / 20)


def unit(x):
    """Scale to rms 1."""
    return x / np.sqrt(np.mean(x ** 2) + 1e-20)


def add(track, s, sound):
    """Mix a sound into a track from time s."""
    part = track[..., round(s * SR):][..., :sound.shape[-1]]
    part += sound[..., :part.shape[-1]]


def scene():
    """Handling, then the motor, over the quiet of the room."""
    machine = motor() + whistles() + airflow() + mains() * SHARED_ONLY
    hands = lid() + switch() + handling() + lead_ins() + rubbing()
    hands = hands + bumps(DULL_BUMPS, t60_s=0.078, gain_db=4.5) * SHARED_ONLY
    return bass_image(ports(machine + hands + rumble()) + quiet()) + fingers()


def record(dry):
    """The camera drops the deepest bass and keeps nothing above its band limit."""
    return filtered(dry, lambda hz: (hz < TOP_HZ) * hz ** 4 / (hz ** 4 + LOW_CUT_HZ ** 4))


dry = scene()
out = record(dry)
generate_wav(out)
```